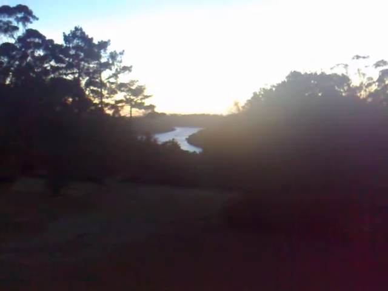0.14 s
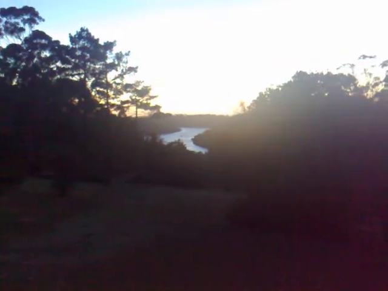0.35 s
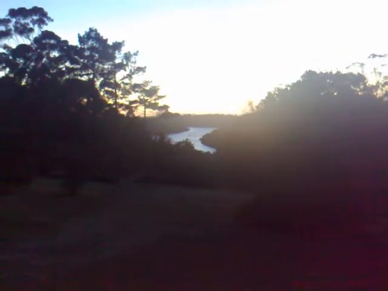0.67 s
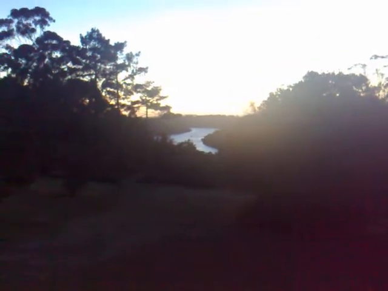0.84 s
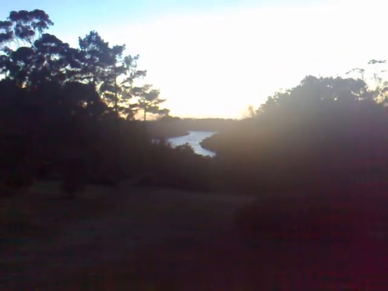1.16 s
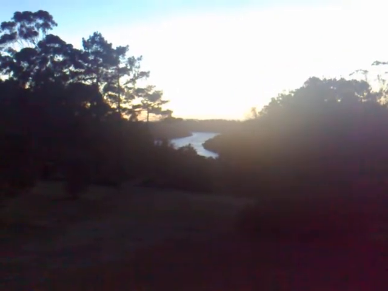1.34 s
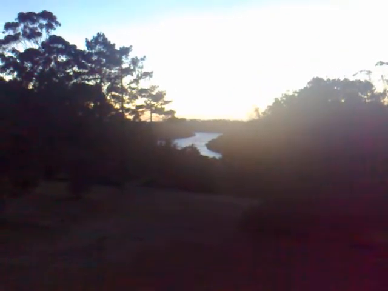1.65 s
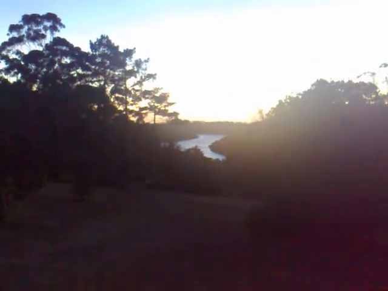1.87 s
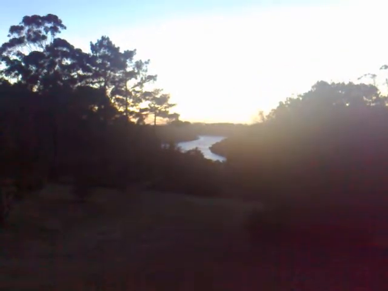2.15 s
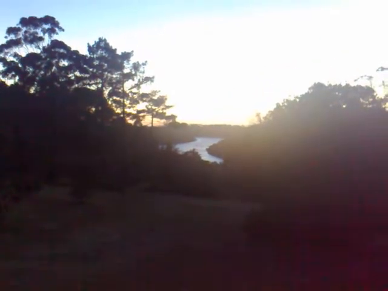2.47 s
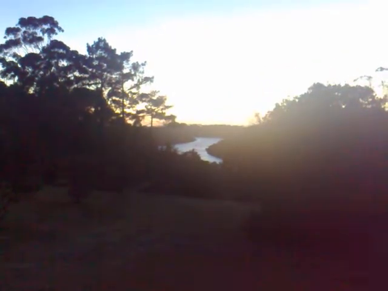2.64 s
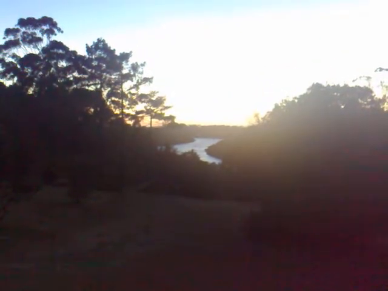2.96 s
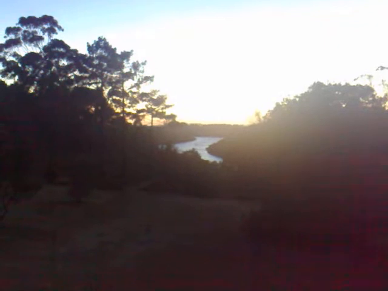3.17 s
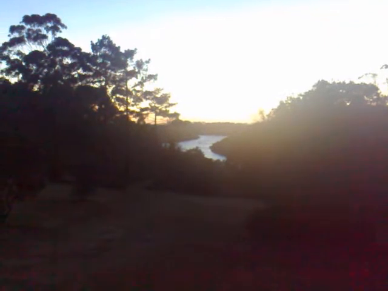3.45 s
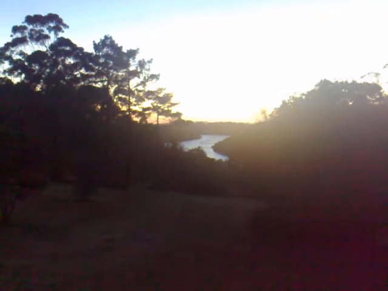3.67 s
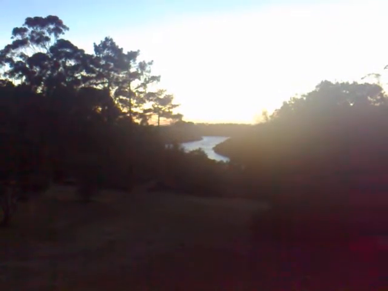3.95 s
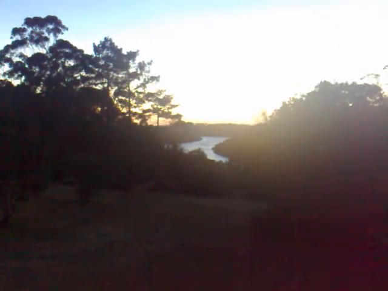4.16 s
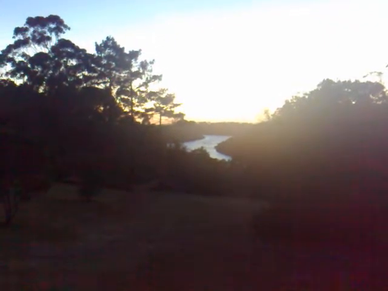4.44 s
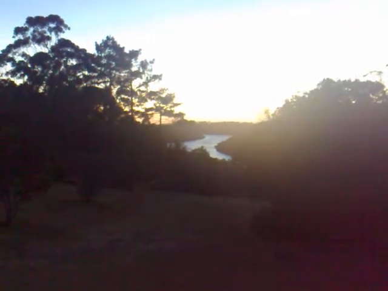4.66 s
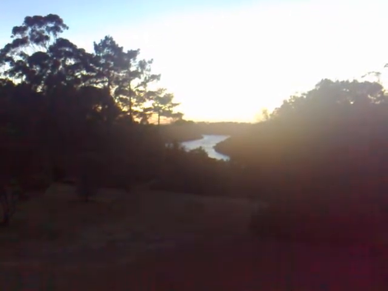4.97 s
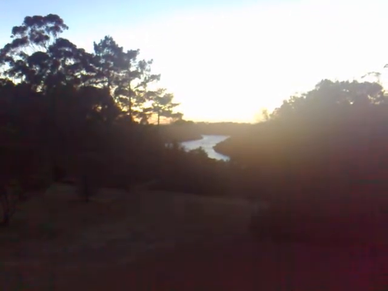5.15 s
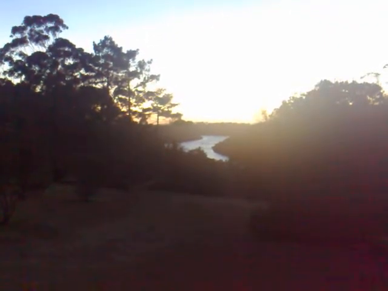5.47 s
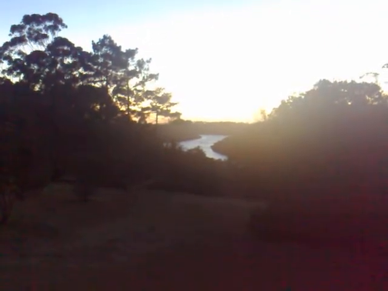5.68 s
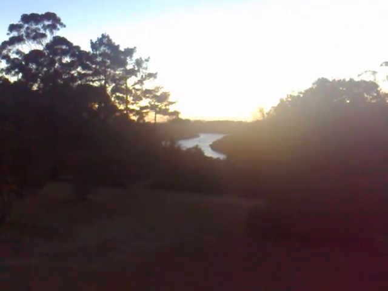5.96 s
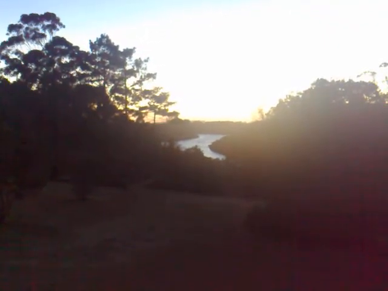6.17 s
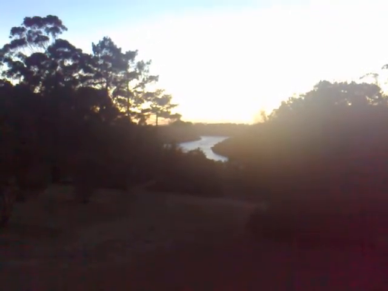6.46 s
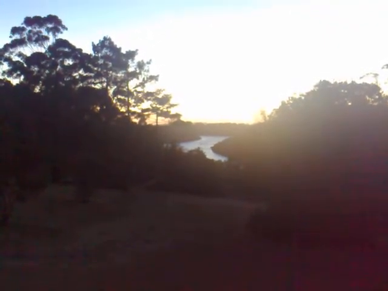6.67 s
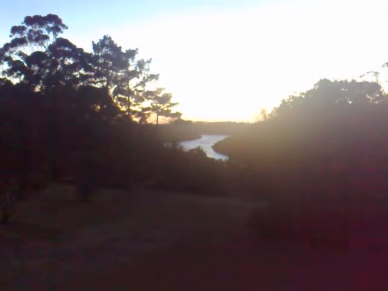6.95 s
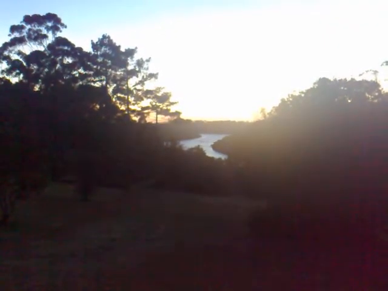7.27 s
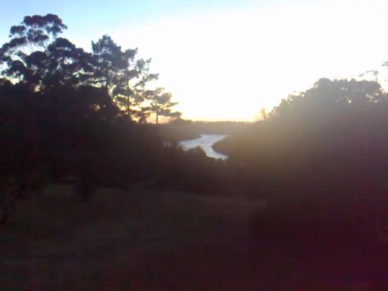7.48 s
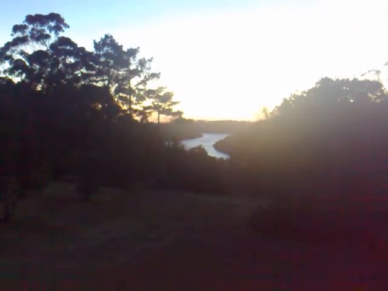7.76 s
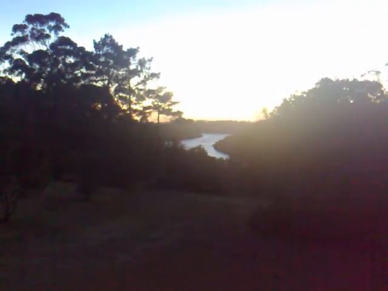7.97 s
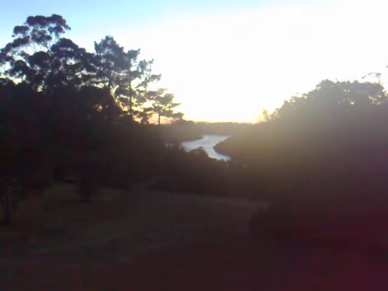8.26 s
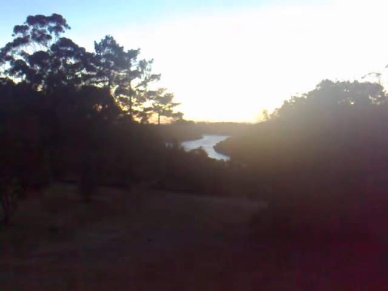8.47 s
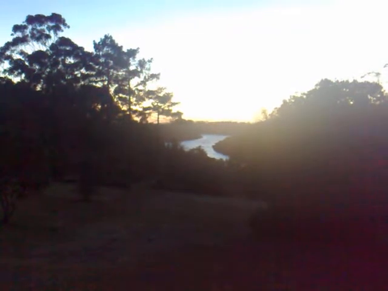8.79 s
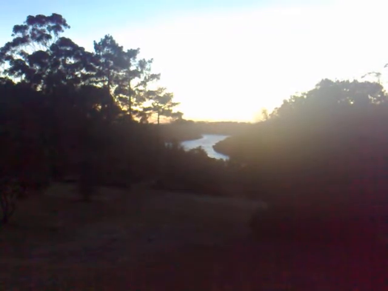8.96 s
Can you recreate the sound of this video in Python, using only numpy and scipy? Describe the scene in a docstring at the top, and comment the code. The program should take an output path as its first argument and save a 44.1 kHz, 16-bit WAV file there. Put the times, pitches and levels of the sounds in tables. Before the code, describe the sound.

Songbirds chirp and twitter in waves at dawn, one nearer bird whistling two quick bright runs over faint steady outdoor hiss.

```python
"""A near songbird at dawn on a wooded slope sings two runs of trills, glides, slurs and three-swoop songs:
almost pure tones on moving pitch curves. Another bird's rising chips are harmonics weighted by its throat,
and one harsh rasp is a shaped burst of noise. Farther birds whistle and twitter as short gliding, warbled
tones, smeared by random echoes from the trees, over low outdoor air and a faint hiss of filtered noise."""
import sys
import numpy as np
from scipy import signal
from scipy.fft import rfft, irfft
from scipy.io import wavfile
from scipy.ndimage import uniform_filter1d

SR = 44100
rng = np.random.default_rng(int(sys.argv[2]) if len(sys.argv) > 2 else 0)


def master_out(mix):
    """Clip the mix to full scale and print it as 16-bit PCM to the path in sys.argv[1]."""
    frames = np.transpose(np.atleast_2d(mix))
    ceiling = np.clip(frames, -1, 1)
    pcm = np.round(ceiling * 32767).astype(np.int16)
    wavfile.write(sys.argv[1], SR, pcm)


N = 402191  # samples

# The near bird's songs: swoop 1 t/s, swoop 2 t/s, swoop 3 t/s, end t/s,
# resting pitch at the start f/Hz, leap f/Hz, level at the start level/dB
SONG_NOTES = [(2.425, 2.485, 2.578, 2.617, 3464, 821, -44), (6.742, 6.8, 6.882, 6.917, 3500, 875, -38),
              (7.45, 7.506, 7.583, 7.607, 3477, 945, -40), (8.223, 8.276, 8.351, 8.411, 3520, 705, -39.5)]
# Height of each of the three swoops: [share of the leap]
SWOOP_HEIGHTS = [.9, 1.1, 0.346]
SONG_LEAD_S = 0.012  # whistle before the first swoop
SAG_HZ_PER_S, SONG_FADE_DB_PER_S = 1300, 45


def song(first, second, third, end, rest_hz, leap_hz, db, thinning_db=-4):
    """Frequency modulation: three swoops on a sagging, fading whistle, which thins at each crest."""
    t = np.arange(first - SONG_LEAD_S, end, 1 / SR)
    age = t - t[0]
    swoop_times = (first, second, third)
    lift = sum(share * swoop(t - s) for s, share in zip(swoop_times, SWOOP_HEIGHTS))
    hz = rest_hz - SAG_HZ_PER_S * age + leap_hz * lift
    level_db = db - SONG_FADE_DB_PER_S * age + thinning_db * lift ** 4
    return t[0], hz, level_db


def swoop(t, leap_s=0.00553, crest_s=0.013, drop_s=0.01, crest_dip=0.408):
    """Exponential pitch transients: a leap up to t = 0, a dip between two crests, a drop back; 0 to 1."""
    crest = 1 - crest_dip * np.sin(np.pi * np.clip(t / crest_s, 0, 1)) ** 2
    return crest * np.exp(np.minimum(t, 0) / leap_s - np.maximum(t - crest_s, 0) / drop_s)


# Falling slurs: start t/s, length t/s, top f/Hz, end f/Hz, fall time t/s, level at the start level/dB
SLUR_NOTES = [(1.96, 0.067, 3690, 2840, 0.028, -48.5), (6.08, 0.087, 4275, 3310, 0.017, -37.5),
              (7.012, 0.064, 3880, 2940, 0.035, -39.5), (7.188, 0.1, 4460, 3080, 0.039, -39.5),
              (7.913, 0.1, 3990, 3164, .022, -43)]
SCOOP_S, SCOOP_HZ = 0.013, 640
SLUR_FADE_DB = -13.5  # change of level by the end


def falling_slur(start, length, top_hz, end_hz, fall_s, db, roundness=1.32, hold=1.96):
    """Pitch relaxation: a scoop up to the top, then a stretched-exponential slide down with a fade."""
    t = np.arange(0, length, 1 / SR)
    scoop = np.maximum(1 - t / SCOOP_S, 0) ** 2
    fall = np.exp(-(np.maximum(t - SCOOP_S, 0) / fall_s) ** roundness)
    hz = end_hz + (top_hz - end_hz) * fall - SCOOP_HZ * scoop
    return start, hz, db + SLUR_FADE_DB * (t / length) ** hold


# Plain glides, mostly upward: start t/s, length t/s, start f/Hz, end f/Hz, level in the middle level/dB
GLIDE_NOTES = [(1.926, 0.035, 4250, 3410, -43), (2.103, 0.13, 3660, 4620, -43),
               (2.273, 0.047, 3300, 3605, -41.5), (6.443, 0.12, 3710, 4493, -39.5),
               (6.593, 0.038, 3190, 3640, -42.5)]
GLIDE_EASE, GLIDE_ENDS_DB = 1.5, -6.5


def gliding_whistle(start, length, start_hz, end_hz, db):
    """Monotonic frequency sweep: one smooth glide, loudest in the middle."""
    hz = glide(length, start_hz, end_hz, GLIDE_EASE)
    return start, hz, db + GLIDE_ENDS_DB * np.linspace(-1, 1, len(hz)) ** 2


# Fast falling trills, the shortest only two flicks long: start t/s, length t/s, start of fall f/Hz,
# end of fall f/Hz, flick before it shrinks f/Hz, mid-trill level between flicks level/dB,
# swell from start to end level/dB
TRILL_NOTES = [(1.801, 0.043, 5010, 3460, 1200, -48, -10), (6.301, .042, 4810, 3380, 1516, -47.5, 5),
               (7.723, .115, 4710, 3610, 855, -42.5, 4.5)]
FLICKS_PER_S, FIRST_FLICK_S = 56, 0.01145
TRILL_SCOOP_HZ, TRILL_SCOOP_S = 1490, 0.00475


def trill(start, length, start_hz, end_hz, flick_hz, db, swell_db, ease=1.3, thinning_db=-5, shrink=0.394):
    """Periodic frequency modulation: sharp, shrinking flicks at a steady rate on a falling whistle."""
    hz = glide(length, start_hz, end_hz, ease)
    t = np.arange(len(hz)) / SR
    flick = 1 - abs(np.sin(np.pi * FLICKS_PER_S * (t - FIRST_FLICK_S)))
    scoop = TRILL_SCOOP_HZ * np.exp(-t / TRILL_SCOOP_S)
    hz = hz + flick_hz * flick * (1 - shrink * t / length) - scoop
    return start, hz, db + thinning_db * flick + swell_db * (t / length - .5)


def near_whistles(flutter_db=1.0, octave_db=-42, tremor_share=0.007):
    """Nearly sinusoidal phonation: tones with a weak second harmonic, random tremor and level flutter."""
    out, tremor, flutter = np.zeros(N), wander(460), wander(81)
    repertoire = [(song, SONG_NOTES), (falling_slur, SLUR_NOTES),
                  (gliding_whistle, GLIDE_NOTES), (trill, TRILL_NOTES)]
    for shape, rows in repertoire:
        for row in rows:
            start, hz, db = shape(*row)
            at = round(start * SR) + np.arange(len(hz))
            hz = hz * (1 + tremor_share * tremor[at])
            whistle = tone(hz, edge_s=0.0058) + amp(octave_db) * tone(2 * hz)
            add(out, start, amp(db + flutter_db * flutter[at]) * whistle)
    return out


# Rising chips of the second bird: start t/s, overall level/dB
CHIP_CALLS = [(0.508, -47.5), (0.561, -52.5), (1.966, -43), (2.007, -47), (3.71, -45.5)]
# Course of one chip: t/s from its start, fundamental f/Hz, level/dB added to the overall level
CHIP_COURSE = [(0, 1376, -11), (.008, 1291, -3.5), (.016, 1567, -0.5), (.023, 1950, 7), (.029, 2190, -7.5)]
# Resonance of the chipping bird's throat: f/Hz, gain level/dB
THROAT_RESPONSE = [(1200, -17), (1600, -10.5), (2000, -9), (2300, 5), (2700, 2.5), (3300, 0.5), (4000, -9),
                   (4700, -10), (6000, -44)]


def chips(jitter=0.015, rough_db=2.0):
    """Source-filter voice: hoarse upward sweeps; the throat favours the second harmonic, then the first."""
    out, tremor, flutter = np.zeros(N), wander(530), wander(450)
    t, hz, db = play(CHIP_COURSE)
    for s, level_db in CHIP_CALLS:
        at = ((s + t) * SR).astype(int)
        chip = 0
        for k in range(1, 4):
            harmonic = k * hz * (1 + jitter * tremor[at])
            throat_db = np.interp(harmonic, *np.transpose(THROAT_RESPONSE))
            chip = chip + amp(throat_db) * tone(harmonic)
        add(out, s, amp(level_db + db + rough_db * flutter[at]) * chip)
    return out


# Spectrum of the rasp before scaling to rms 1: f/Hz, relative level/dB
RASP_SPECTRUM = [(900, -28), (1450, -17), (2400, -2.5), (3200, -6.5), (4200, -4.5), (4900, 2.5), (5600, -7),
                 (6800, -11), (8200, -25), (15000, -25)]
RASP_START_S, RASP_PEAK_S, RASP_END_S = 2.315, 2.414, 2.495
RASP_PEAK_DB, RASP_SWELL_S, RASP_FADE_S, RASP_ROUNDNESS = -38.5, 0.053, 0.041, 1.7


def rasp(rough_db=1.7):
    """Amplitude-modulated noise: a harsh, fluttering band that swells, peaks and dies away."""
    out = np.zeros(N)
    t = np.arange(RASP_START_S, RASP_END_S, 1 / SR) - RASP_PEAK_S
    swell = np.exp(-np.maximum(-t / RASP_SWELL_S, t / RASP_FADE_S) ** RASP_ROUNDNESS)
    flutter_db = rough_db * wander(220)[:len(t)]
    burst = noise(RASP_SPECTRUM)[:len(t)]
    add(out, RASP_START_S, swell * amp(RASP_PEAK_DB + flutter_db) * burst)
    return out


# Warbled phrases of farther birds: start t/s, length t/s, start f/Hz, end f/Hz, warble either way f/Hz,
# level/dB
WARBLED_PHRASES = [(0.185, 0.044, 3650, 3780, 60, -68.5), (0.598, .08, 3650, 3130, 100, -65.5),
                   (0.761, .05, 4400, 4170, 60, -67), (0.808, .08, 3600, 3490, 80, -68),
                   (0.984, 0.13, 4190, 2950, 100, -72), (1.225, 0.12, 4120, 4050, 240, -66.5),
                   (1.644, 0.041, 3230, 2880, 60, -50), (3.298, 0.061, 4530, 3950, 250, -61.5),
                   (3.306, .13, 3170, 3100, 336, -61), (3.742, 0.081, 3400, 2880, 300, -58),
                   (3.995, .13, 4570, 3420, 355, -60), (4.237, 0.11, 3740, 3380, 280, -55),
                   (4.557, 0.1, 3810, 4000, 396, -61), (4.877, 0.12, 4235, 3850, 410, -58),
                   (4.983, 0.12, 4020, 3300, 276, -54), (5.244, 0.061, 3830, 3350, 260, -53.5),
                   (5.53, 0.077, 3286, 3210, 151, -49), (5.674, 0.064, 3850, 2830, 260, -55),
                   (5.851, .078, 5360, 4200, 400, -50), (6.172, 0.042, 3200, 2650, 223, -47.5),
                   (7.08, 0.049, 3050, 2770, 100, -50.5), (7.159, 0.14, 3070, 2880, 100, -53),
                   (7.363, 0.18, 4690, 3830, 220, -54.5), (8.018, 0.045, 3080, 2920, 90, -54.5)]
# Their clear whistles: start t/s, length t/s, start f/Hz, end f/Hz, level/dB
CLEAR_WHISTLES = [(.085, 0.036, 4250, 3400, -68), (0.82, 0.022, 2400, 2550, -62),
                  (1.287, 0.041, 2850, 2490, -57), (1.597, .05, 2350, 3220, -54.5),
                  (2.77, 0.072, 3700, 2810, -59.5), (2.894, 0.054, 4160, 4670, -67),
                  (3.05, .055, 3150, 3570, -66), (3.425, 0.015, 5270, 4900, -61),
                  (3.475, 0.021, 2290, 2540, -55.5), (3.679, 0.054, 3840, 3410, -58.5),
                  (4.077, 0.042, 2460, 2374, -53.5), (4.44, .025, 4500, 5180, -61),
                  (4.473, .054, 2900, 4130, -57), (4.529, 0.032, 4630, 4566, -47),
                  (4.675, 0.032, 2180, 2150, -62), (5.387, 0.027, 4690, 4600, -59),
                  (5.195, .022, 4840, 5450, -57.5), (5.265, 0.03, 4300, 5440, -57.5),
                  (5.492, 0.033, 2450, 2830, -52.5), (5.495, 0.056, 4100, 3500, -53.5),
                  (5.711, 0.016, 3050, 3850, -48), (5.763, .03, 4450, 3920, -57),
                  (6.251, 0.042, 3450, 3350, -51.5), (8.075, 0.013, 2800, 2760, -45),
                  (8.527, .078, 4370, 4370, -67), (8.54, 0.072, 2380, 2370, -64.5),
                  (8.877, 0.064, 4200, 2880, -62.5)]
# Their thin, very high trills: start t/s, length t/s, central pitch f/Hz, level/dB
HIGH_TRILLS = [(1.201, .066, 5370, -72), (2.67, 0.12, 7200, -73), (5.405, 0.17, 7750, -72),
               (7.015, .12, 8060, -68.5), (7.03, .082, 5560, -67), (7.154, 0.072, 6470, -67),
               (8.964, 0.083, 7300, -71)]
FAR_EASE, THIN_WARBLE_HZ = 1.8, 223


def far_birds():
    """Superposition of sources: warbles, clear whistles and thin trills from the surrounding trees."""
    out = np.zeros(N)
    for s, length, start_hz, end_hz, warble_hz, db in WARBLED_PHRASES:
        course = glide(length, start_hz, end_hz, FAR_EASE)
        add(out, s, amp(db) * slur(length, course, warble_hz, rng.random(3)))
    for s, length, start_hz, end_hz, db in CLEAR_WHISTLES:
        course = glide(length, start_hz, end_hz, FAR_EASE)
        add(out, s, amp(db) * tone(course, edge_s=0.0022))
    for s, length, hz, db in HIGH_TRILLS:
        add(out, s, amp(db) * slur(length, [hz, hz], THIN_WARBLE_HZ, rng.random(3)))
    return out


def stray_notes(level_db=-75):
    """Sparse random superposition: faint single notes that carry on through the lulls."""
    return amp(level_db) * twitter(count=90, centre_hz=3530, spread=.25, bend=0.086, max_warble_hz=109)


# How busy the distant chorus is: t/s, level/dB of its main voices
CHORUS_COURSE = [(0, -82), (1, -103), (1.7, -62), (2.8, -70.5), (3.4, -66), (4.3, -62), (4.8, -65),
                 (5.6, -58.5), (6.5, -60), (7.5, -59.5), (8.3, -62.5), (8.7, -81), (9.1, -66)]


def chorus(low_db=-13):
    """Slow amplitude modulation: the distant chorus and its fewer low voices rise and fall in waves."""
    main_voices = twitter(count=640, centre_hz=3410, spread=.29)
    low_voices = twitter(count=200, centre_hz=2022, spread=.2, max_warble_hz=90)
    level_db = np.interp(np.arange(N) / SR, *np.transpose(CHORUS_COURSE))
    return (main_voices + amp(low_db) * low_voices) * amp(level_db)


def twitter(count, centre_hz, spread, bend=.08, max_warble_hz=260):
    """Random superposition: many birds, each note with its own pitch, slope and length; rms 1."""
    out = np.zeros(N)
    draws = zip(rng.random((count, 7)), rng.standard_normal((count, 4)))
    for k, (uniform, normal) in enumerate(draws):
        length, warbling, lateness, distance, *chance = uniform
        pitches = centre_hz * np.exp(spread * np.tanh(normal[0]) + bend * normal[1:])
        note = slur(0.0205 + .06 * length, pitches, max_warble_hz * warbling, chance)
        start = (k + lateness) / count * N / SR
        add(out, start, amp(-8 * distance) * note)  # up to 8 dB weaker
    return unit(out)


def slur(length, pitches, warble_hz, chance, uneven=0.243, flutter_db=0.5):
    """Sawtooth frequency modulation: a glide whose warble jumps up quickly and slides down, unevenly."""
    t = np.arange(0, max(length, .01), 1 / SR)
    corners = np.interp(t, np.linspace(0, t[-1], len(pitches)), pitches)
    course = uniform_filter1d(corners, size=400)
    speed, phase, drift = chance
    warbles_per_s = 42 * (.7 + 0.593 * speed)
    turns = warbles_per_s * t + phase
    turns = turns + uneven * np.sin(2 * np.pi * (turns / np.e + drift))
    warble = signal.sawtooth(2 * np.pi * turns, .25)  # rises for a quarter of each turn
    return amp(flutter_db * warble) * tone(course + warble_hz * warble, edge_s=0.0029)


def woods(x, t60, delay_s=0.0044, echoes_per_s=5000):
    """Multiple scattering: trunks and leaves spread a sound into a decaying tail of sparse echoes."""
    t = np.arange(SR) / SR
    echoes = rng.choice([-1., 1.], SR) * (rng.random(SR) < echoes_per_s / SR)
    build_up = 1 - np.exp(-(t / delay_s) ** 2)
    tail = echoes * amp(-60 * t / t60) * build_up
    return signal.fftconvolve(x, tail / np.linalg.norm(tail))[:N]


# Spectrum of the low outdoor air before scaling to rms 1: f/Hz, relative level/dB per Hz
AIR_SPECTRUM = [(12, -26), (20, -4.5), (65, -1.5), (107, -5.5), (315, -7.5), (396, -10), (490, -11.5),
                (1500, -20.5), (1780, -20), (2000, -20.5), (2600, -30), (4400, -120)]
# Spectrum of the hiss before scaling to rms 1: f/Hz, relative level/dB
HISS_SPECTRUM = [(1200, -8.5), (2200, 4.5), (4000, 1.5), (5500, -0.5), (6400, -2), (6800, 3), (7200, -3),
                 (9500, -3.5), (11500, -2), (13000, 1.5), (14500, -4.5), (16000, 0.5)]
AIR_DB, HISS_DB = -61.5, -62.5  # rms levels; the air's before it stirs


def background(stir_db=3.2):
    """Stationary filtered noise: low outdoor air, whose deepest part stirs a little, under an even hiss."""
    air = noise(AIR_SPECTRUM)
    deep = signal.sosfiltfilt(signal.butter(2, 130, fs=SR, output="sos"), air)
    stirring = deep * (amp(stir_db * wander(3.2)) - 1)
    return amp(AIR_DB) * (air + stirring) + amp(HISS_DB) * noise(HISS_SPECTRUM)


def glide(length, start_hz, end_hz, ease):
    """Power-law frequency sweep: the pitch moves quickly at first and levels off."""
    return end_hz + (start_hz - end_hz) * np.linspace(1, 0, round(length * SR)) ** ease


def tone(hz, edge_s=0.0016):
    """Phase is the integral of frequency: a sine on a pitch curve, rms 1 between its soft ends."""
    fade = signal.windows.tukey(len(hz), min(1, 2 * edge_s * SR / len(hz)))
    return np.sqrt(2) * fade * np.sin(2 * np.pi * np.cumsum(hz) / SR)


def noise(colour):
    """Spectral shaping: noise of rms 1 with the spectrum (f/Hz, level/dB)."""
    hz, db = np.transpose(colour)
    log_hz = np.log(np.fft.rfftfreq(N, 1 / SR) + 1)  # + 1 avoids log(0)
    gain = amp(np.interp(log_hz, np.log(hz), db))
    return unit(irfft(rfft(rng.standard_normal(N)) * gain, N))


def wander(rate_hz):
    """Gaussian low-pass filtering: smooth chance of rms 1, mostly no faster than rate_hz."""
    low_pass = np.exp(-(np.fft.rfftfreq(N, 1 / SR) / rate_hz) ** 2)
    return unit(irfft(rfft(rng.standard_normal(N)) * low_pass, N))


def play(rows):
    """Linear interpolation: rows (t/s, value, ..) become sample times and one curve a column."""
    s, *columns = np.transpose(sorted(rows))
    t = np.arange(s[0], s[-1], 1 / SR)
    return [t] + [np.interp(t, s, c) for c in columns]


def amp(db):
    """Logarithmic level: decibels to amplitude gain."""
    return 10 ** (np.asarray(db) / 20)


def unit(x):
    """Root-mean-square normalisation: scales to rms 1."""
    return x / np.sqrt(np.mean(x ** 2) + 1e-20)


def add(mix, s, sound):
    """Linear superposition: mixes a sound in at time s."""
    part = mix[max(round(s * SR), 0):][:len(sound)]
    part += sound[:len(part)]


def scene():
    """Direct-to-reverberant ratio: the farther the bird, the more of it arrives as echo."""
    whistles, calls, harsh = near_whistles(), chips(), rasp()
    far = far_birds() + stray_notes()
    near = whistles + amp(-13) * woods(whistles, t60=0.088)
    near += amp(-8) * woods(whistles, t60=0.17) + amp(-9.5) * woods(whistles, t60=0.49)
    near += calls + amp(-5.5) * woods(calls, t60=0.25)
    near += harsh + amp(-14) * woods(harsh, t60=0.64)
    middle = amp(-2.0) * far + amp(-4.0) * woods(far, t60=0.3)
    distant = amp(-1.5) * woods(chorus(), t60=0.42)
    return (near + middle + distant + background())[None]


def record(dry, fizz_db=-22, edge_hz=15950):
    """Signal-dependent noise and band limiting: hiss follows the running rms, then the top is cut."""
    loudness = np.sqrt(abs(uniform_filter1d(dry ** 2, size=500, axis=1)))
    sound = dry + amp(fizz_db) * loudness * rng.standard_normal(N)
    low_pass = signal.firwin(601, edge_hz, window=("kaiser", 9), fs=SR)
    return signal.oaconvolve(sound, low_pass[None], "same")


dry = scene()
out = record(dry)
master_out(out)
```